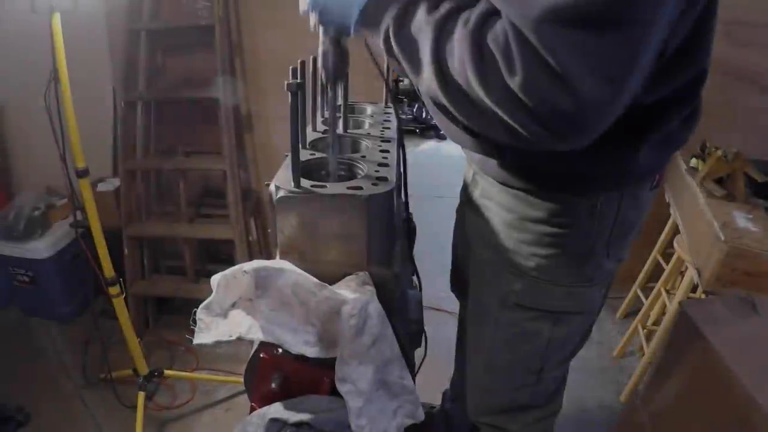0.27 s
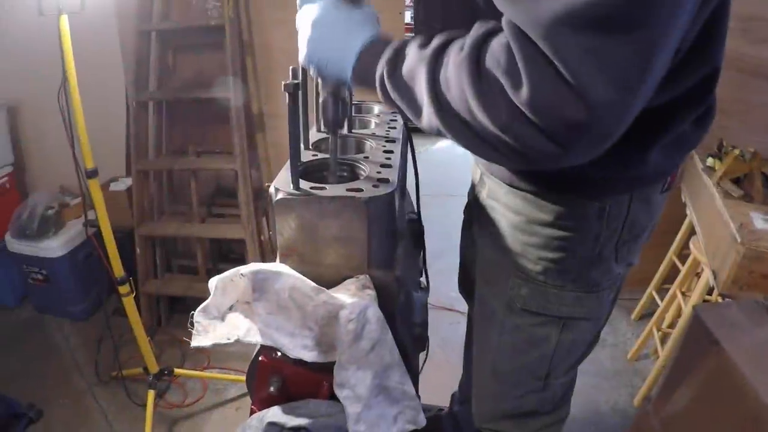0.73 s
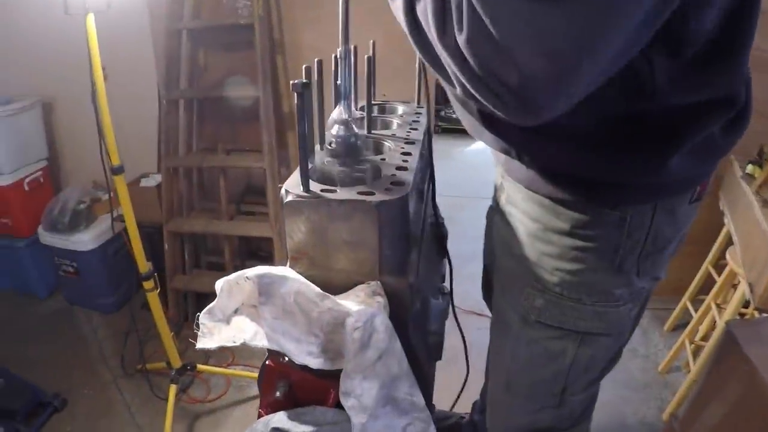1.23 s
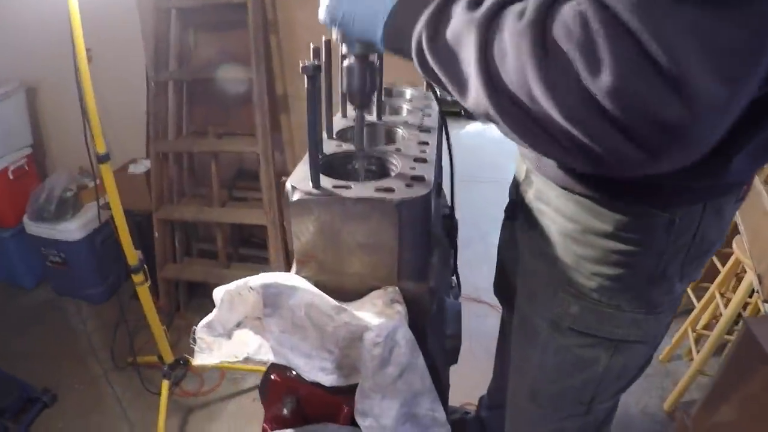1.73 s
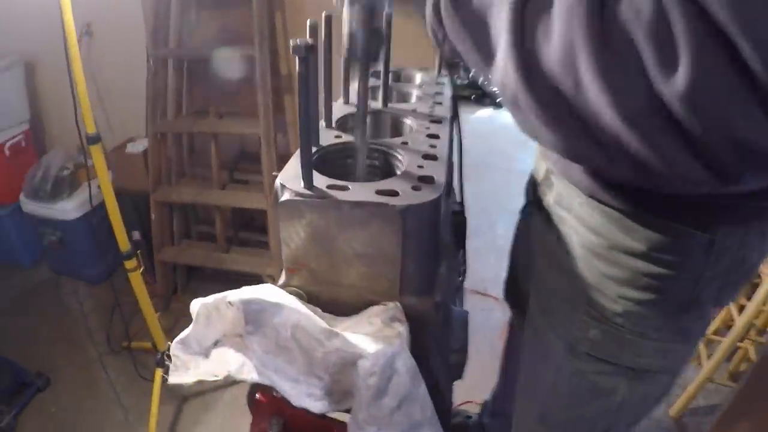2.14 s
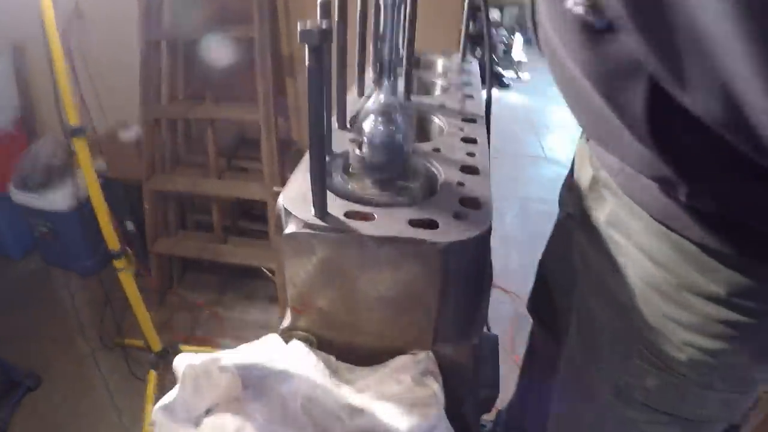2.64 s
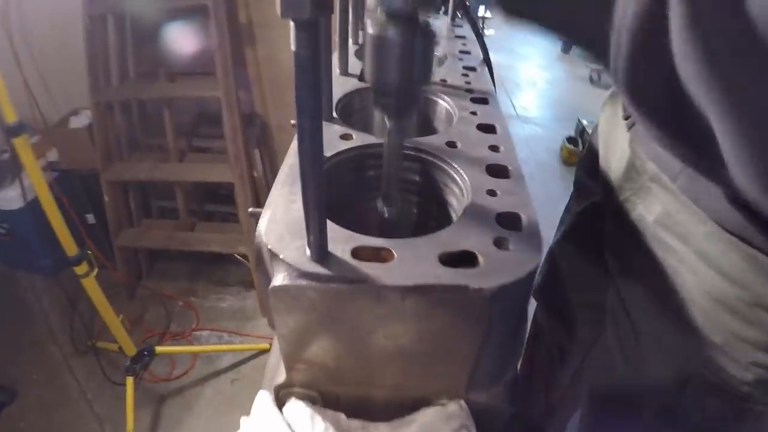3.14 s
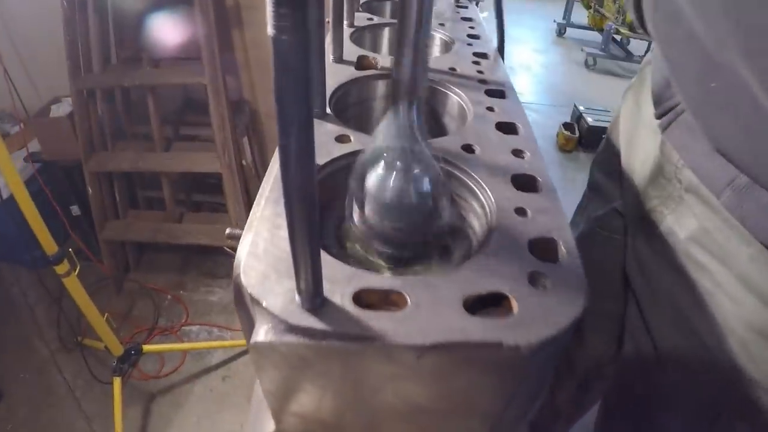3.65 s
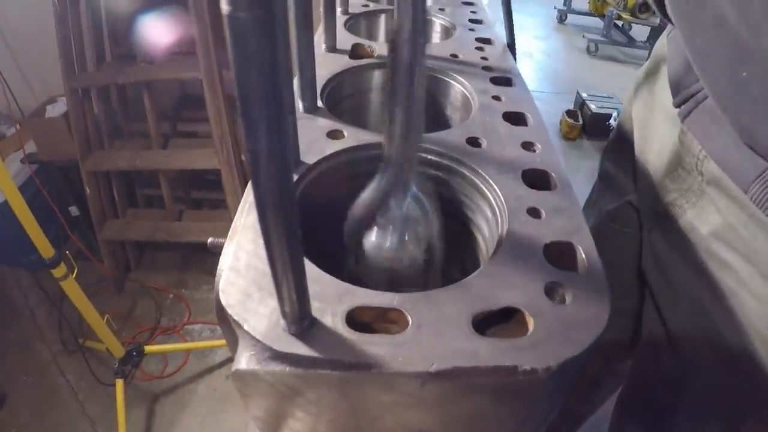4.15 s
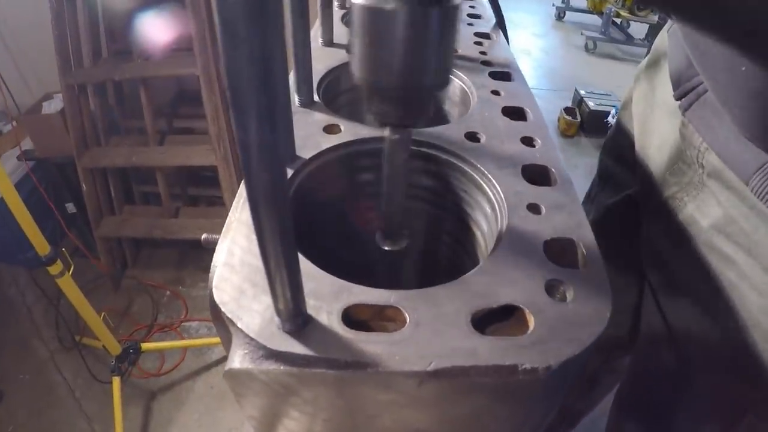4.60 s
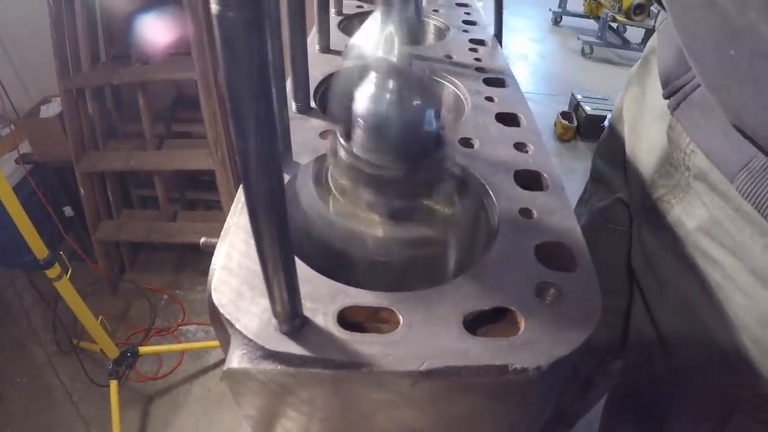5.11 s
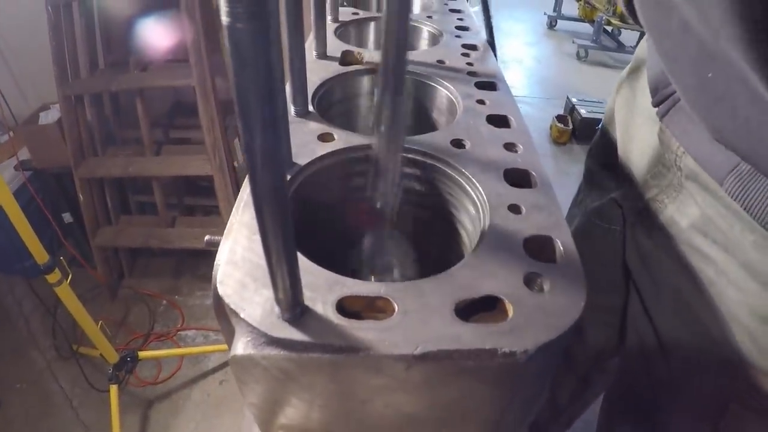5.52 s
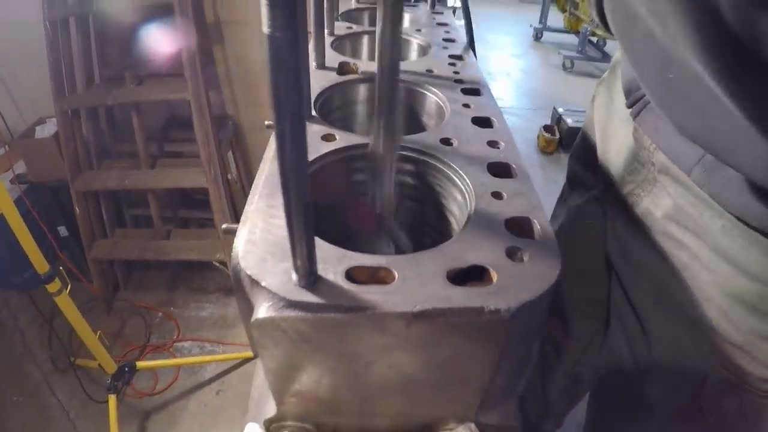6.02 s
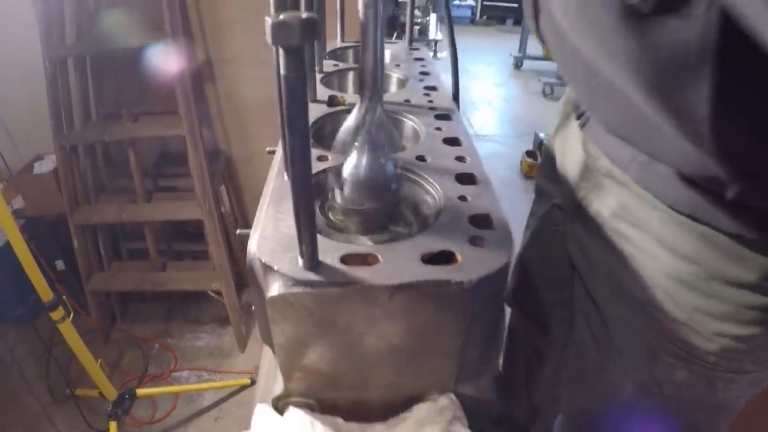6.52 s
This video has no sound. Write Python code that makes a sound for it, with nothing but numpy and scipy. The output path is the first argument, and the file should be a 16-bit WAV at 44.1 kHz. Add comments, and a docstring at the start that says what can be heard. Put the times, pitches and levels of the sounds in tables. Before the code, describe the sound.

An electric drill whines and chatters as a stone hone rasps up and down a metal engine bore, chirping shrilly near each stroke's top.

```python
"""An electric drill drives a stone hone up and down an engine bore, close by in a workshop, its speed sagging
and recovering: shaft-locked tones and noise bands give the whine, motor hum and gear chatter. Filtered noise
makes the stones' rasp, the housing drone and the cooling air; gliding sines make the chirps of stick-slip,
about once a turn of the hone near the top of each stroke, and a few soft bumps. A short room tail follows the
drill and stones. At the end the scene changes: after a brief silence comes a short burst of harsher noise."""
import sys
import numpy as np
from scipy import signal
from scipy.fft import rfft, irfft, next_fast_len
from scipy.io import wavfile
from scipy.ndimage import uniform_filter1d, map_coordinates

SR = 44100
rng = np.random.default_rng(int(sys.argv[2]) if len(sys.argv) > 2 else 0)


def file_out(sig):
    """Save sig as 16-bit WAV at sys.argv[1]."""
    # one column per channel
    cols = np.atleast_2d(sig).T
    # limit, then scale
    lim = np.clip(cols, -1, 1)
    pcm = np.round(lim * 32767).astype(np.int16)
    wavfile.write(sys.argv[1], SR, pcm)


N = 298155
LAYSHAFT, CHUCK = 7 / 45, 0.06505  # gear ratios: turns per motor turn


def amp(db):
    """Level as a logarithm of amplitude: decibels to gain."""
    return 10 ** (np.asarray(db) / 20)


def unit(x):
    """Normalisation of mean power: scale to rms 1."""
    return x / np.sqrt(np.mean(x ** 2) + 1e-20)


def curves(rows):
    """Linear interpolation: one value per sample for each column after the time."""
    times, *columns = np.transpose(rows)
    return [np.interp(np.arange(N) / SR, times, column) for column in columns]


def wobble(rate):
    """Band-limited random process: a smooth curve through rate random knots a second."""
    knots = rng.standard_normal(int(N * rate / SR) + 4)
    return map_coordinates(knots, [np.arange(N) * rate / SR])


def noise():
    """White noise: equal mean power at every frequency."""
    return rng.standard_normal(N)


def filtered(x, response):
    """Linear filtering: the spectrum of x times a complex response of frequency."""
    size = next_fast_len(N + SR // 4)
    return irfft(rfft(x, size) * response(np.fft.rfftfreq(size, 1 / SR)), size)[:N]


def coloured(x, spectrum):
    """Spectral shaping: x through a (frequency [Hz], level [dB]) curve, at rms 1."""
    f, db = np.transpose(spectrum)
    return unit(filtered(x, lambda hz: amp(np.interp(np.log(hz + 1), np.log(f), db))))


def resonate(x, modes):
    """Modal superposition: x through (frequency [Hz], width [Hz], level [dB]) resonances, at rms 1."""
    def response(f):
        total = 0
        for k, (centre, width, db) in enumerate(modes):
            damping = 1j * f * width
            total = total + (-1) ** k * amp(db) * damping / (centre ** 2 - f ** 2 + damping)
        return total
    return unit(filtered(x, response))


def tones(turns, orders, blur, blur_rate):
    """Order tones: sines at whole multiples of shaft speed, phase-modulated at random by blur radians."""
    total = np.zeros(N)
    for k, db in orders:
        phase = 2 * np.pi * (round(k) * turns + rng.random()) + blur * wobble(blur_rate)
        total += amp(db) * np.sin(phase)
    return total


def bands(turns, table):
    """Quadrature modulation: narrow noise bands that ride up and down with the shaft speed."""
    total = np.zeros(N)
    for k, width, db in table:
        angle = 2 * np.pi * k * turns
        total += amp(db) * (wobble(width) * np.cos(angle) + wobble(width) * np.sin(angle))
    return total


def even(x, seconds):
    """Automatic gain: keep the fine grain of x but hold its short-term rms at 1."""
    power = uniform_filter1d(x ** 2, max(8, int(seconds * SR)))
    return x / np.sqrt(np.abs(power) + 1e-9)


def motor_turns():
    """Rotation is the time integral of speed; the rotor's inertia rounds off changes of speed."""
    # motor speed, which sags as the stones drag: (time [s], speed [turns/s])
    speed_points = [(0.0, 350.5), (0.25, 342), (0.47, 347), (0.77, 368), (1.12, 340), (1.35, 349.5),
                    (1.6, 332.5), (2.11, 364), (2.52, 329), (2.98, 321), (3.41, 354.5), (3.8, 334),
                    (4.25, 326), (4.76, 366), (5.1, 341), (5.61, 334), (5.98, 371.5), (6.3, 351),
                    (6.52, 360.5), (6.68, 356.5)]
    speed, = curves(speed_points)
    return np.cumsum(uniform_filter1d(speed, size=SR // 8)) / SR


def strokes():
    """Reciprocation: nearness of the drill body swells on the way down and falls on the way up."""
    # down strokes: (time at the bottom [s], 1/e time going down [s], 1/e time coming up [s], nearness [0-1])
    down_strokes = [(0.77, 0.27, 0.34, 0.3), (2.07, 0.34, 0.73, 0.41), (3.4, 0.48, 0.24, 0.79),
                    (4.7, 0.26, 0.18, 0.91), (5.88, 0.26, 0.3, 0.87)]
    t = np.arange(N) / SR
    near = np.zeros(N)
    for s, down, up, depth in down_strokes:
        near += depth * np.exp(-((t - s) / np.where(t < s, down, up)) ** 2)
    return near


def level(near, far_db, closer_db, bottom_db):
    """Level against distance: far level, gain by moving in, gain per unit of drill nearness, all in dB."""
    # the microphone moves in on the bore: (time [s], closeness [0-1])
    approach = [(0.0, 0.0), (1.7, 0.15), (2.6, 0.68), (3.5, 1.0), (6.0, 0.97), (6.68, 0.83)]
    close, = curves(approach)
    return far_db + closer_db * close + bottom_db * near


def motor(turns):
    """Order tones: fan tones and higher motor and gear tones whine over the hum of the armature."""
    # fan tones at 12 and 24, with higher whine tones of the motor and gears:
    # (multiple of motor speed [1], relative level [dB])
    whine_orders = [(12, 3), (24, -13), (28, -25), (35, -19)]
    # noise around the whine tones: (multiple of motor speed [1], width [Hz], relative level [dB])
    whine_bands = [(12.13, 90, -22), (24.3, 140, -14), (34.2, 200, -28), (35, 140, -20)]
    # armature hum: (multiple of motor speed [1], relative level [dB])
    hum_orders = [(2, -13.5), (3, 2.5), (5, -29), (6, -7)]
    # whine, before a 2 dB cut and a random wobble: (time [s], level [dB])
    whine_points = [(0.0, -35), (0.5, -31), (0.85, -34.5), (1.35, -32.5), (1.6, -26.5), (1.85, -31.5),
                    (2.1, -28), (2.55, -33), (3.08, -24.5), (3.4, -26.5), (3.85, -40), (4.25, -35),
                    (4.62, -25.5), (5.0, -37), (5.3, -46), (5.5, -31), (5.88, -25), (6.68, -33)]
    # motor hum, before a 2 dB cut and a random wobble: (time [s], level [dB])
    hum_points = [(0.0, -37.5), (0.55, -29.5), (1.3, -34), (1.55, -46), (1.82, -30), (2.4, -32),
                  (2.72, -28.5), (3.07, -35), (3.38, -28), (3.65, -39), (3.96, -27.5), (4.18, -41),
                  (4.7, -27.5), (5.0, -41.5), (5.35, -37.5), (5.92, -31), (6.68, -43)]
    whine_db, = curves(whine_points)
    hum_db, = curves(hum_points)
    whine_tones = tones(turns, whine_orders, blur=0.44, blur_rate=50) + bands(turns, whine_bands)
    whine = (amp(whine_db - 2.0 + 1.6 * wobble(25)) + amp(-59)) * whine_tones  # never wholly silent
    armature = tones(turns, hum_orders, blur=0.57, blur_rate=40)
    return whine + amp(hum_db - 2.0 + 1.5 * wobble(25)) * armature


def heavy_chatter(idle_db):
    """Addition of powers: each spell of heavier chatter sets in fast, sags and lets go."""
    # spells of heavier gear chatter: (start [s], end [s], level at the start, before a 5 dB cut [dB])
    chatter_spells = [(0.66, 0.98, -22.5), (1.85, 2.202, -21.5), (2.435, 2.768, -19), (3.51, 4.383, -13.5),
                      (4.76, 5.643, -14), (6.04, 6.676, -14)]
    attack_s, release_s, sag_db_per_s = 0.012, 0.028, 3.5
    t = np.arange(N) / SR
    power = amp(idle_db) ** 2
    for start, end, db in chatter_spells:
        onset = (1 + np.tanh((t - start) / attack_s / 2)) / 2
        release = (1 + np.tanh((end - t) / release_s / 2)) / 2
        power = power + (onset * release * amp(db - sag_db_per_s * (t - start))) ** 2
    return 10 * np.log10(power)


def gear_chatter(turns, chatter_db):
    """Eccentric meshing: a seven-tooth pinion's tone swoops, then teeth rattle, in each wheel turn."""
    # teeth rattling in their backlash: (multiple of motor speed [1], width [Hz], relative level [dB])
    rattle_bands = [(7.44, 220, -2), (7.877, 220, 2), (8.72, 280, -2.5), (9.95, 200, -1.5),
                    (20.85, 130, -12.5)]
    # ringing tones of the rattle: (multiple of motor speed [1], relative level [dB])
    teeth_orders = [(6, -6), (8, 1.5), (9, 1.5), (10, -19)]
    # what the gear case passes: (frequency [Hz], relative level [dB])
    gearcase = [(1500, -8), (2150, -4), (2400, 0.5), (2750, 1.5), (3150, 1), (3500, -7), (6000, -1),
                (7000, 5), (8000, -9)]
    mesh_growth = 0.29  # dB that the mesh tone gains over the rattle for each dB of chatter
    motor_angle = 2 * np.pi * turns
    layshaft = LAYSHAFT * motor_angle
    mesh_phase = 7 * motor_angle + layshaft + 1.7 * np.cos(layshaft) + 0.99 * wobble(70)
    mesh_tone = np.sin(mesh_phase) + amp(-23.0) * np.sin(3 * mesh_phase)
    tight_side = amp(5.5 * np.cos(layshaft - 2.6) + 1.3 * wobble(74))
    swoop = unit(mesh_tone * tight_side)
    ring = unit(tones(turns, teeth_orders, blur=.55, blur_rate=60))
    clatter = unit(bands(turns, rattle_bands) * amp(2 * np.cos(motor_angle)))
    slack_side = amp(3.8 * np.cos(layshaft - 5))
    rattle = unit(even(clatter + amp(-1.5) * ring, seconds=0.013) * slack_side)
    load = amp(mesh_growth * (chatter_db - chatter_db.max()))
    mixture = (load * swoop + rattle) / np.hypot(load, 1)
    return amp(chatter_db - 5.0) * coloured(mixture, gearcase)


def gears(turns, near, rasp_db):
    """Periodic loading: chatter and whirr swell once a hone turn; the housing's resonances drone."""
    # whirr of the loaded gears: (multiple of motor speed [1], width [Hz], relative level [dB])
    whirr_bands = [(1.412, 70, -22), (5.1, 70, -19.5), (6.16, 100, -25), (6.976, 130, -3), (7.965, 60, -7),
                   (14.16, 110, -12), (15.34, 220, -18), (15.9, 38, -34), (28.25, 120, -17)]
    chatter_db = heavy_chatter(level(near, far_db=-24.5, closer_db=5.5, bottom_db=-1))
    chatter = gear_chatter(turns, chatter_db)
    whirr = amp(rasp_db - 8.0) * even(bands(turns, whirr_bands), seconds=0.012)
    press = amp(1.83 * np.cos(2 * np.pi * CHUCK * turns - 1))  # the hone drags hardest once a turn
    return press * (chatter + whirr) + housing(turns, near)


def housing(turns, near):
    """Forced resonance: noise pulsing with the layshaft excites the modes of the drill housing."""
    # resonances of the housing: (frequency [Hz], width [Hz], relative level [dB])
    housing_modes = [(503, 60, -25), (854, 106, 2), (1037, 120, 2)]
    # drone, before the lift of each stroke and a 6 dB cut: (time [s], level [dB])
    drone_points = [(0.0, -26), (0.6, -29.5), (1.45, -24.5), (1.95, -30), (2.5, -24), (3.1, -32.5),
                    (3.9, -29.5), (5.3, -32.5), (6.68, -29.5)]
    drone_db = curves(drone_points)[0] + 5 * near  # dB gained per unit of nearness
    excitation = noise() * amp(2 * np.cos(2 * np.pi * LAYSHAFT * turns))
    return amp(drone_db - 6.0) * resonate(excitation, housing_modes)


def stones(turns, rasp_db):
    """Abrasive friction: grit scrapes the bore, harder once a hone turn; catches ring the wall briefly."""
    # spectrum of the scrape: (frequency [Hz], relative level [dB per Hz])
    scrape_spectrum = [(60, -18.5), (300, -12.5), (700, -3.5), (1300, -2.5), (1900, -4.5), (2600, 2),
                       (3300, 2), (3800, -0.5), (4450, 1.5), (5250, 3), (6200, -1.5), (7600, -4.5),
                       (8400, -2.5), (9200, -8), (10000, -4), (11300, -12), (15500, -16)]
    wall_modes = [(5294, 74, 0.5), (5020, 180, -3.5)]
    grit = noise() * amp(2.0 * wobble(2500))
    pressure = amp(np.cos(2 * np.pi * CHUCK * turns - 1) + 0.5 * wobble(60))
    catches = unit(resonate(noise(), wall_modes) * amp(5.2 * wobble(55)))
    scrape = coloured(grit, scrape_spectrum)
    return amp(rasp_db) * pressure * (amp(-1.0) * scrape + amp(-11) * catches)


def draught(near):
    """Turbulent flow: cooling air rushes from the vents and buffets the microphone as the drill nears."""
    # rush of the air: (frequency [Hz], relative level [dB per Hz])
    rush_spectrum = [(100, -10.5), (350, -12), (750, -7), (1050, -15), (1250, -1), (1800, 2), (2000, 0.5),
                     (2250, 10.5), (3500, -16.5), (4400, 3.5), (6500, -7), (12000, -29)]
    # hiss of the air: (frequency [Hz], relative level [dB per Hz])
    hiss_spectrum = [(4000, -41), (9000, -5.5), (11500, 5), (12500, 3.5), (14000, -1), (15500, -1)]
    # eddies at the microphone: (frequency [Hz], relative level [dB per Hz])
    buffet_spectrum = [(15, -6), (50, -3.5), (120, -5), (190, -4.5), (260, -9), (600, -8.5), (2000, -70)]
    # deepest eddies: (frequency [Hz], relative level [dB per Hz])
    gust_spectrum = [(10, -17), (24, 5.5), (35, 0), (52, -7.5), (90, -11.5), (200, -40), (1000, -80)]
    rush_db = level(near, far_db=-31, closer_db=-2, bottom_db=14)
    hiss_db = level(near, far_db=-42.5, closer_db=6, bottom_db=5)
    # the eddies reach the microphone over a longer part of each stroke
    spread_near = uniform_filter1d(near, int(0.38 * SR))  # seconds
    eddy_db = level(spread_near, far_db=-55, closer_db=12, bottom_db=8.5)
    rush = amp(rush_db + 0.25 * wobble(30)) * coloured(noise(), rush_spectrum)
    hiss = amp(hiss_db) * coloured(noise(), hiss_spectrum)
    buffet = amp(eddy_db - 3.5 + 1.7 * wobble(17)) * coloured(noise(), buffet_spectrum)
    # the deepest eddies grow fastest as the vents come near
    gusts = amp(1.275 * eddy_db + 10.0) * coloured(noise(), gust_spectrum)
    return rush + hiss + buffet + gusts


def slips(turns):
    """Stick-slip timing: one (s, dB, Hz) row per hone turn in a squeal, plus strays and hard slips."""
    # squeals near the top of a stroke: (start [s], end [s], chirp level before scatter and cut [dB])
    squeals = [(0.024, 0.45, -12), (1.349, 1.75, -13), (2.682, 3.029, -9.5), (3.831, 4.41, -11.5),
               (5.073, 5.58, -12), (6.443, 6.667, -8.5)]
    # the hardest slips: (time [s], level before a lift and cut [dB], centre pitch [Hz])
    hard_slips = [(1.3498, -7.5, 10630), (1.523, -13.5, 10500), (1.656, -10, 10540), (2.8684, -7.5, 10500),
                  (4.0074, -4, 10520), (4.1024, -5, 10650), (4.241, -7.5, 10650), (4.3774, -9, 10430),
                  (5.219, -8.5, 10700), (5.3474, -4, 10660), (6.5314, -7.5, 10650)]
    pitch_hz, pitch_scatter_hz, jitter_s, scatter_db = 10622, 80, 0.003, 1.5
    edge_db = -0.5  # the ends of a squeal are softer
    strays_per_s, stray_db = 3, -23.5  # faint lone chirps at any time
    hard_lift_db = 2.5  # the hard slips stand out from the rest
    t, hone = np.arange(N) / SR, CHUCK * turns
    rows = []
    for start, end, db in squeals:
        first_turn, last_turn = np.interp([start, end], t, hone)
        for s in np.interp(np.arange(first_turn, last_turn), hone, t):
            from_middle = 2 * (s - start) / (end - start) - 1
            rows.append((s, db + edge_db * from_middle ** 2))
    for s in rng.random(int(strays_per_s * N / SR)) * N / SR:
        rows.append((s, stray_db))
    hard = np.array(hard_slips)
    half_turn_s = t[-1] / hone[-1] / 2
    # a hard slip takes the place of any soft one within half a turn
    soft = np.array([(s, db, pitch_hz) for s, db in rows if np.abs(s - hard[:, 0]).min() > half_turn_s])
    scatter = rng.standard_normal(soft.shape) * [jitter_s, scatter_db, pitch_scatter_hz]
    return np.vstack([hard + [0, hard_lift_db, 0], soft + scatter])


def chirps(turns):
    """Stick-slip oscillation: each slip swells, slides in pitch and trails off in flutter."""
    typical_fall_s = 0.005  # 1/e time after the peak; the rise is twice as fast
    out = np.zeros(N + SR)
    t = np.arange(-SR // 50, SR // 8) / SR
    waver, flutter = wobble(300), amp(7.65 * wobble(160))
    trail = np.exp(-np.logaddexp(-t / 0.0025, t / 0.055))  # rise and decay times in s
    for s, db, hz in slips(turns):
        slide, stretch, start_phase = rng.standard_normal(3)
        first = max(0, int((s + t[0]) * SR))
        span = np.arange(first, first + len(t))
        u = (t - .005) / (typical_fall_s * np.exp(0.77 * stretch))
        peak = np.exp(-np.where(u < 0, 2.0 * u, u) ** 2)
        swell = peak + 0.18 * trail * flutter[span % N]
        pitch = hz + (-70 + 60 * slide) * np.tanh(u) + 90 * waver[span % N]
        phase = 2 * np.pi * np.cumsum(pitch) / SR + start_phase
        out[span] += amp(db - 6.5) * swell * np.sin(phase)
    return out[:N]


def workshop(x, t60, wet_db):
    """Reverberation: the short, exponentially decaying diffuse answer of a cluttered room."""
    t = np.arange(SR // 3) / SR
    tail = rng.standard_normal(len(t)) * amp(-60 * t / t60) * (t > .004)
    return x + amp(wet_db) * signal.fftconvolve(x, tail / np.linalg.norm(tail))[:N]


def bumps():
    """Low-frequency pulses: sines under bell-shaped envelopes, from the tool and the engine stand."""
    # soft bumps: (start [s], peak level [dB], pitch [Hz], length between 1/e points [s])
    soft_bumps = [(0.62, -42, 191, 0.18), (1.148, -39, 314, 0.073), (2.121, -32, 41.7, 0.065),
                  (2.466, -40, 311, .06), (6.298, -38, 325, 0.066)]
    t = np.arange(N) / SR
    total = np.zeros(N)
    for s, db, hz, length in soft_bumps:
        envelope = np.exp(-((t - s) / (length / 2) - 1) ** 2)
        total += amp(db) * envelope * np.sin(2 * np.pi * hz * (t - s))
    return total


def harsh_noise():
    """Spectral shaping: steady noise with uneven peaks makes the harsher sound of the next scene."""
    # spectrum of the harsh noise: (frequency [Hz], relative level [dB per Hz])
    harsh_spectrum = [(24, -32), (40, 5.5), (412, -26), (514, -19), (845, -12), (1000, -10), (1260, -21),
                      (1390, -13), (2060, -3.5), (2580, -13), (3140, -3), (4680, -14), (5290, -6),
                      (5990, -16.5), (15000, -28)]
    return amp(-16.5) * coloured(noise(), harsh_spectrum)


def scene():
    """Superposition: layers follow the motor and strokes, fade in and break off; after a brief silence the
    scene changes to harsh noise."""
    silence_start_s, silence_end_s = 6.685, 6.729
    fade_db, fade_s = -7, 0.24  # opening level and time constant of its recovery
    t = np.arange(N) / SR
    turns = motor_turns()
    near = strokes()
    rasp_db = level(near, far_db=-23, closer_db=0, bottom_db=2)
    drill = motor(turns) + gears(turns, near, rasp_db)
    work = drill + stones(turns, rasp_db) + chirps(turns)
    honing = workshop(work, t60=0.29, wet_db=-10.5) + draught(near) + bumps()
    fade = amp(fade_db * np.exp(-t / fade_s))
    playing = np.clip((silence_start_s - t) * 1000, 0, 1)  # 1 ms ramps
    resumed = np.clip((t - silence_end_s) * 1000, 0, 1)
    mono = fade * playing * honing + resumed * harsh_noise()
    return np.array([mono, mono])


def record(dry):
    """Band limiting: a linear ramp 200 Hz wide removes everything above the top frequency."""
    top_hz = 15400  # middle of the ramp
    return np.array([filtered(x, lambda hz: np.clip((top_hz - hz) / 200 + .5, 0, 1)) for x in dry])


dry = scene()
out = record(dry)
file_out(out)
```